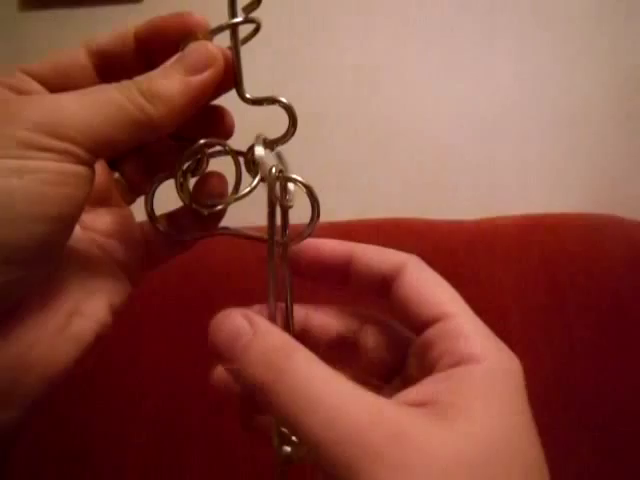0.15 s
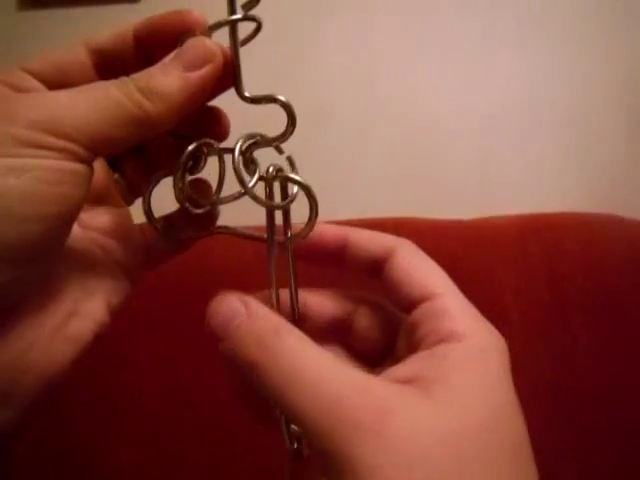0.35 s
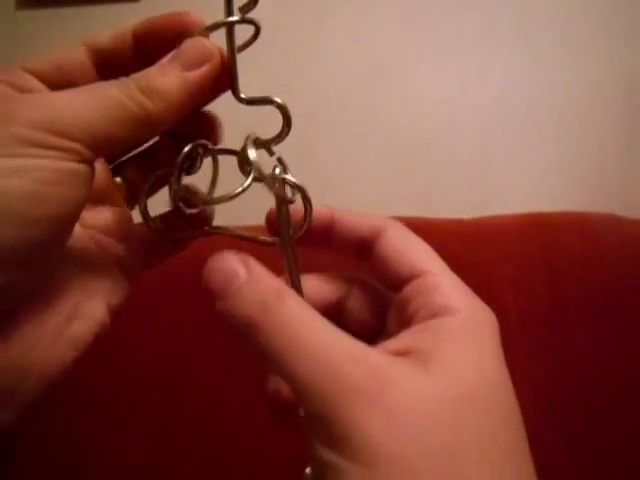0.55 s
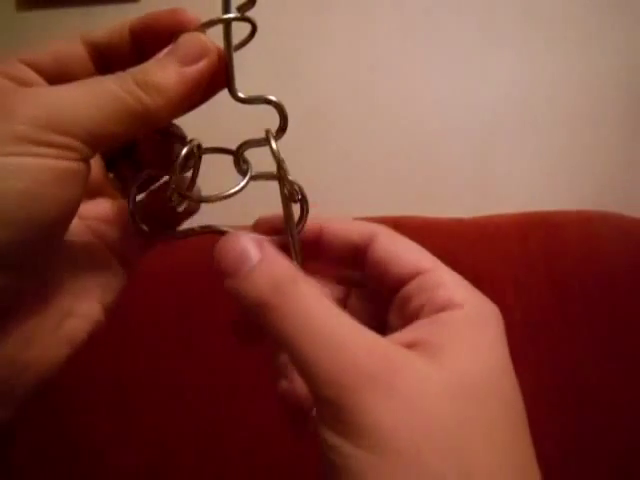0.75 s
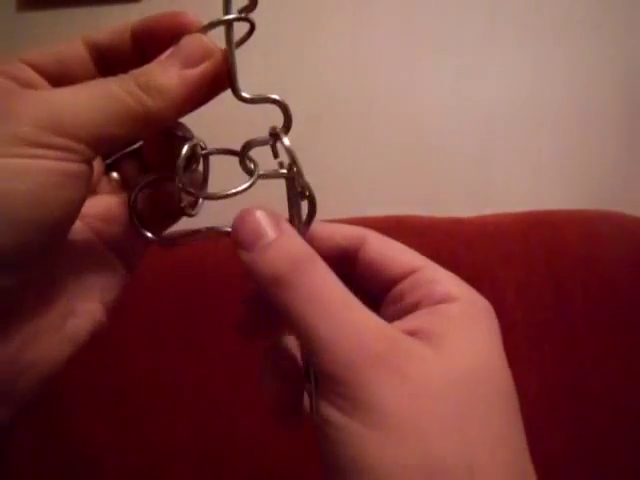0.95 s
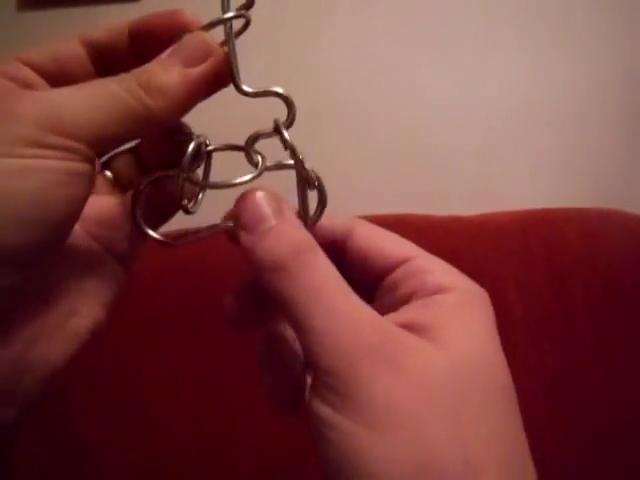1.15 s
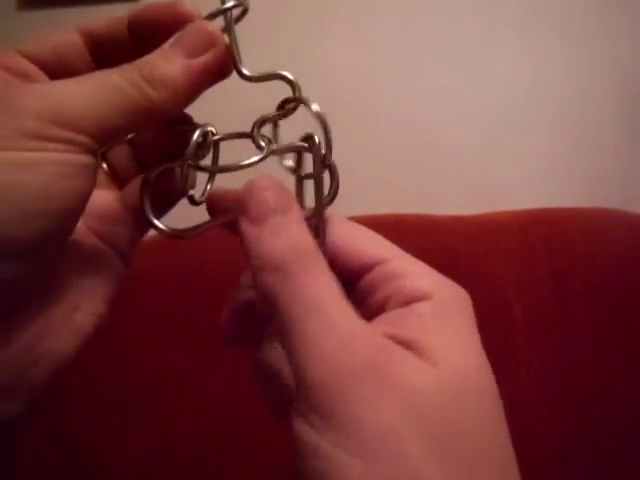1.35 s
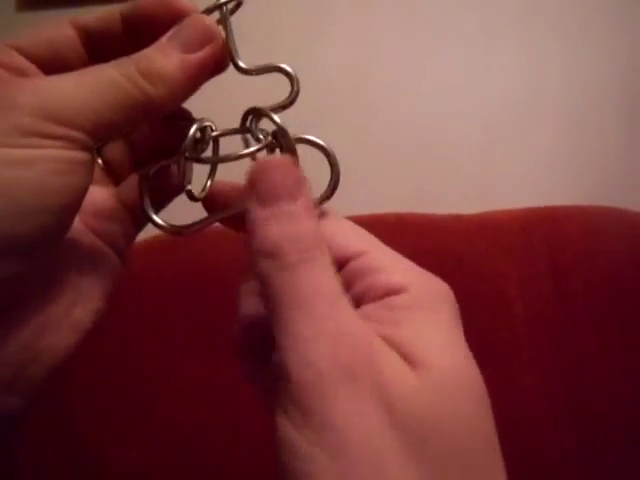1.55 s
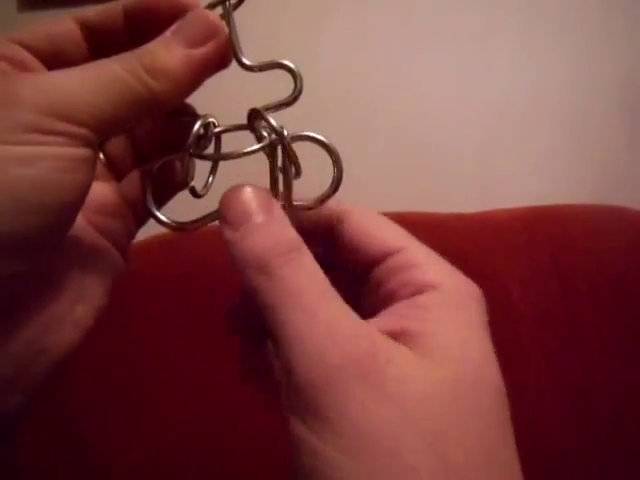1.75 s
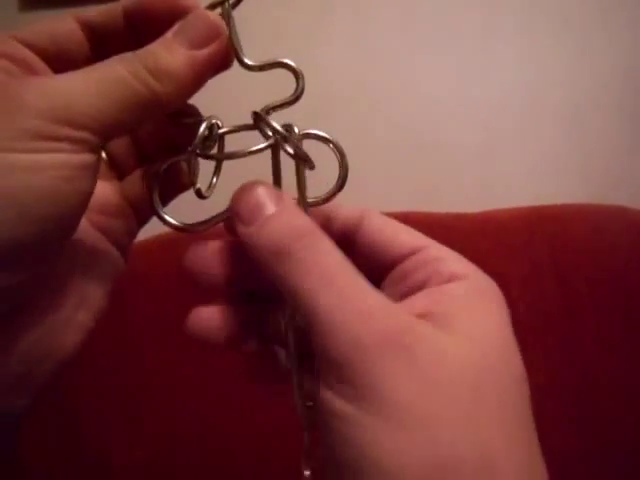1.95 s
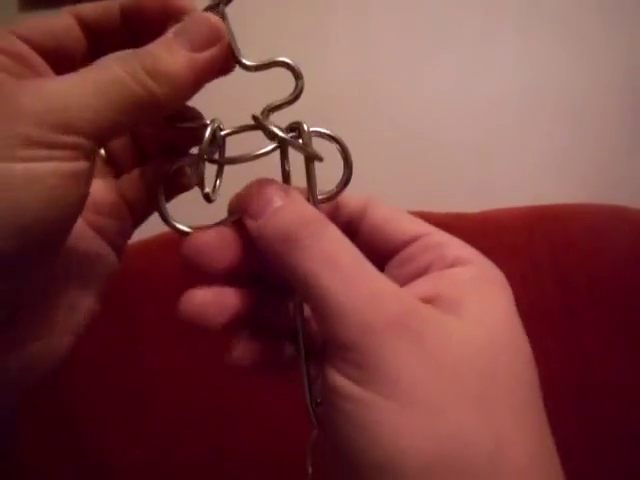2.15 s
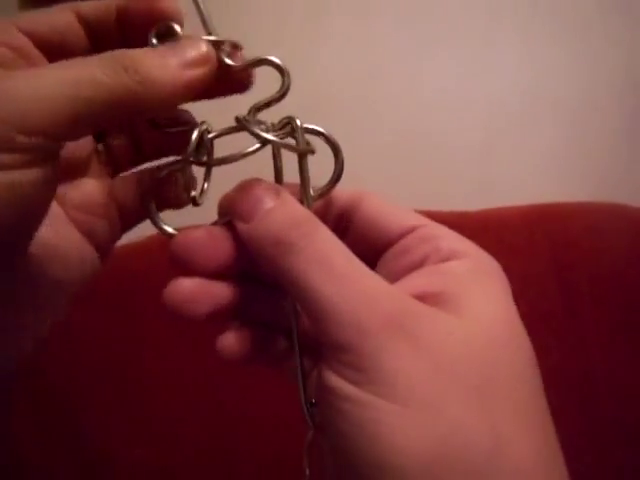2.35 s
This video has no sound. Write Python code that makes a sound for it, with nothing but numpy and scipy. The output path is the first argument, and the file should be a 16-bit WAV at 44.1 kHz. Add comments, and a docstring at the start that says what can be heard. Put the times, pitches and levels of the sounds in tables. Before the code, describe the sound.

Steel rings and wire of a handheld puzzle clink close up, slightly right, in a small quiet room. Light ticks from 0.1 s lead to a high singing ring around 0.4 s and the loudest, dense rattle at 0.6-0.8 s. After one small tick at 1.0 s, a second flurry runs 1.35-1.7 s, with sparse touches around 2.0 and 2.2 s. Soft rushing hiss swells and sinks over faint hum.

```python
"""Hands work a steel wire puzzle in a quiet room, close to two microphones and mostly a little to the right.
Over a faint hum and a rush that swells and sinks, light touches come first and a free ring starts to sing;
by 0.6 s they grow into the biggest rattle, with ring, wire loop and handle ringing. After a lull come a second
flurry from 1.35 s and a few last touches from 1.96 s. Each touch is a chatter of tiny contacts driving the
high modes of the steel; free parts ring as dying sines, and the rush is coloured noise."""
import sys
import numpy as np
from scipy import signal
from scipy.fft import rfft, irfft, next_fast_len
from scipy.io import wavfile

SR = 44100
rng = np.random.default_rng(int(sys.argv[2]) if len(sys.argv) > 2 else 0)


def waveform_to_disk(signal):
    """Save audio, clipped to [-1, 1], as 16-bit WAV at the path in sys.argv[1]."""
    frames = np.transpose(np.atleast_2d(signal))
    scaled = np.clip(frames, -1, 1) * 32767
    samples = np.round(scaled).astype(np.int16)
    wavfile.write(sys.argv[1], SR, samples)


N = 105840  # samples, 2.4 s

ROOM_DB = -8.5  # room tail against the direct sound
FREE_PAN_DB = 1.5  # place of the singing parts before the lean of the pair; positive is left
RELEASE_S = 0.0016  # shortest time constant with which a chatter dies


def amp(db):
    """Amplitude factor of a level in dB."""
    return 10 ** (np.asarray(db) / 20)


def unit(x):
    """Scale x to an rms of 1."""
    return x / np.sqrt(np.mean(x ** 2) + 1e-20)


def along(points, hz):
    """Read (Hz, value) points on a log frequency axis, flat beyond the ends."""
    f, v = np.transpose(points)
    return np.interp(np.log(hz + 1), np.log(f + 1), v)


def filtered(x, response):
    """Multiply the spectrum of x by a response of frequency."""
    n = x.shape[-1]
    m = next_fast_len(n + 8192)
    return irfft(rfft(x, m) * response(np.fft.rfftfreq(m, 1 / SR)), m)[..., :n]


def causal(gain_db, size=512):
    """Minimum-phase impulse response with the given dB colour: its energy comes as early as it can."""
    cepstrum = irfft(np.log(amp(gain_db(np.fft.rfftfreq(size, 1 / SR)))))
    cepstrum[1:size // 2] *= 2
    cepstrum[size // 2 + 1:] = 0
    return irfft(np.exp(rfft(cepstrum)))


def add(out, s, x):
    """Mix x into out at time s."""
    part = out[:, max(round(s * SR), 0):][:, :x.shape[-1]]
    part += x[..., :part.shape[1]]


def noise(spectrum):
    """Coloured stereo noise of rms 1; mid and side are weighted so that the bass is narrower."""
    # likeness of the two microphones: f/Hz, correlation
    likeness = [(30, .75), (100, 0.56), (300, .3), (800, 0.17), (3000, 0.17), (12000, 0.041)]

    def mid_and_side(hz):
        turn = np.arccos(np.clip(along(likeness, hz), -1, 1)) / 2
        return amp(along(spectrum, hz)) * [np.cos(turn), np.sin(turn)]

    mid, side = filtered(rng.standard_normal((2, N)), mid_and_side)
    return unit(np.array([mid + side, mid - side]))


def background():
    """A soft rush and its hiss, both coloured noise, swell together over a faint steady sine hum."""
    # shared swell of rush and hiss: t/s, level/dB
    swell_points = [(0.0, -60.5), (0.48, -50.5), (0.75, -50), (0.86, -56.5), (1.34, -56.5), (1.62, -50),
                    (2.02, -52.5), (2.2, -50.5), (2.33, -51), (2.4, -51)]
    # colour of the rush: f/Hz, relative level/dB per Hz
    rush_colour = [(15, -66), (25, 2), (102, -6), (264, -7.5), (318, -6.5), (472, -9.5), (991, -11.5),
                   (2080, -16.5), (2310, -15.5), (8240, -21.5), (9660, -26), (14000, -36.5)]
    # colour of the hiss: f/Hz, relative level/dB per Hz
    hiss_colour = [(2000, -21), (5000, -17), (8000, -13.5), (11000, -10), (14000, -11)]
    rush_db, hiss_db = 5, 0  # over the swell
    hum_hz, hum_db = 441.4, -69.5
    t = np.arange(N) / SR
    swell = amp(np.interp(t, *np.transpose(swell_points)))
    rush = amp(rush_db) * noise(rush_colour)
    hiss = amp(hiss_db) * noise(hiss_colour)
    hum = amp(hum_db) * unit(np.sin(2 * np.pi * hum_hz * t))
    return swell * (rush + hiss) + hum


def room(x):
    """The small room's short answer: a dying noise tail, a different one for each microphone."""
    t60_s, onset_s = 0.15, .003
    t = np.arange(SR // 4) / SR
    tail = rng.standard_normal((2, len(t))) * amp(-60 * t / t60_s) * (1 - np.exp(-t / onset_s))
    return signal.fftconvolve(x, tail / np.linalg.norm(tail[0]), axes=1)[:, :x.shape[1]]


def placed(x, pan_db):
    """Share the power of x between the two microphones by frequency, the highest tones leaning right."""
    # lean of the pair: f/Hz, left over right/dB
    lean = [(3000, -1.5), (6300, 4), (9500, -4.5), (13000, -13)]

    def shares(hz):
        left_over_right_db = pan_db + along(lean, hz)
        return np.sqrt(2 / (1 + amp(np.outer([-2, 2], left_over_right_db))))

    return filtered(x, shares)


def in_room(x, pan_db):
    """The direct sound at its place, with its room tail."""
    return placed(x, pan_db) + amp(ROOM_DB) * room(x)


def modes(t, hz, t60):
    """One dying sine for each mode."""
    return np.sin(2 * np.pi * hz[:, None] * t) * amp(-60 * t / np.reshape(t60, (-1, 1)))


def free_part(strikes, partials):
    """A part that no finger damps rings with clear tones until the next knock starts it anew."""
    detune, attack_s, stop_s = 0.0011, 0.00074, .001  # detune is a share of each pitch
    out, t = np.zeros((2, N)), np.arange(SR // 3) / SR
    next_knocks = [row[0] for row in strikes[1:]] + [N / SR]
    hz, mode_db = np.transpose(partials)
    for (s, db, t60, overtones_db), stop in zip(strikes, next_knocks):
        gains = amp(db + mode_db + overtones_db * (hz > hz[0]))
        pitches = hz * (1 + detune * rng.standard_normal(len(hz)))
        tone = gains @ modes(t, pitches, t60)
        attack = 1 - np.exp(-t / attack_s)
        cut = np.exp(-np.maximum(t - (stop - s), 0) / stop_s)
        add(out, s, in_room(np.array([tone, tone]) * attack * cut, FREE_PAN_DB))
    return out


def long_handle():
    """The long handle, nudged during the big rattle, rings in its lower modes."""
    # nudges: t/s, level/dB, t60/s, extra level of the overtones/dB
    nudges = [(.705, -40.5, 0.11, -2), (.768, -44.5, .08, 5)]
    # modes: f/Hz, level/dB
    partials = [(2190, -0.5), (3760, 4), (5420, 12.5)]
    return free_part(nudges, partials)


def wire_loop():
    """The heavy wire loop rings in its own modes when knocked."""
    # knocks: t/s, level/dB, t60/s, extra level of the overtones/dB
    knocks = [(.6395, -28.5, 0.061, 1), (.702, -41.5, 0.14, 11.5), (.767, -35, 0.066, 9)]
    # modes: f/Hz, level/dB
    partials = [(4857, 4), (6580, 2.5), (7650, -6), (9860, -3.5), (11275, 7), (12440, 7)]
    return free_part(knocks, partials)


def swinging_ring():
    """A ring swinging free sings high, each knock setting it off afresh."""
    # knocks: t/s, level/dB, t60/s, extra level of the overtones/dB
    knocks = [(.401, -26, 0.17, 6), (.428, -34.5, 0.17, -3), (.457, -27, 0.25, -8), (.48, -27, 0.13, 6.5),
              (.716, -36, .16, 27), (.733, -40, .16, 22), (.752, -31, .09, 6), (.774, -28, 0.067, 15),
              (1.589, -39, 0.43, -1), (1.614, -29.5, 0.078, -3)]
    # modes: f/Hz, level/dB
    partials = [(9014, 1), (10495, -12.5), (13055, -16), (13600, -18)]
    return free_part(knocks, partials)


def pings():
    """A gripped wire speaks briefly with one tone, set by its free length."""
    # wire held at different points: t/s, f/Hz, level/dB, t60/s
    wire_pings = [(.186, 6050, -29, 0.034), (.457, 5200, -31, 0.029), (1.642, 11220, -14, .04),
                  (1.644, 5860, -32, .04)]
    attack_s = .0005
    out, t = np.zeros((2, N)), np.arange(SR // 5) / SR
    for s, hz, db, t60 in wire_pings:
        x = amp(db) * modes(t, np.array([hz, hz]), t60) * (1 - np.exp(-t / attack_s))
        add(out, s, in_room(x, FREE_PAN_DB))
    return out


def chatter(t, length):
    """A first contact, then a dense run of smaller ones that dies once the parts settle."""
    contacts_per_s, size_scatter_db, first_db = 2200, 3, 3
    fade_share = 0.17  # longer scrapes die more slowly, by this share of their length
    sizes = amp(size_scatter_db * np.clip(rng.standard_normal(len(t)), -2, 1.5))
    hits = (rng.random(len(t)) < contacts_per_s / SR) * sizes
    hits *= rng.choice([-1, 1], len(t))
    hits[0] = amp(first_db)
    return hits * np.exp(-np.maximum(t - length, 0) / (RELEASE_S + fade_share * length))


def damped(colour, count=90):
    """The short ring of gripped wire: every grip leaves other modes."""
    t60_s = .022
    mic_alike = .6  # share of the power common to both microphones
    hz = rng.uniform(2000, 14500, count)
    common, own = rng.standard_normal((2, count))
    left = np.sqrt(mic_alike) * common + np.sqrt(1 - mic_alike) * own
    gains = np.array([left, common]) * amp(colour(hz))
    return gains @ modes(np.arange(SR // 20) / SR, hz, t60_s)


def clink(length, low_db, top_db, ring_db):
    """One touch: a sharp tick, then chatter heard bare, through damped modes and through lasting ones."""
    # lasting modes of the rings: f/Hz, level/dB, t60/s
    steel = [(5450, -16, 0.11), (6010, -14.5, 0.21), (6520, -9, 0.17), (7570, -7.5, 0.24),
             (8780, -2.5, 0.094), (9560, -11, 0.11), (9100, -11.5, .09), (10400, -15, .1),
             (10500, -9, 0.12), (11278, 8, 0.076), (10830, -13, 0.057), (13050, -11, 0.13),
             (12430, -4.5, 0.15), (13045, 9, .11), (13770, -0.5, 0.098)]
    # colour of the contacts and of the modes that the fingers damp: f/Hz, level/dB
    contact_colour = [(300, -66), (1500, -31.5), (3000, -22), (5200, -10.5), (6700, -7), (8100, -12.5),
                      (8900, 1), (11300, 6), (13000, 3), (14200, -1.5)]
    crack_db, damped_db, lasting_db = -5, -3, -6.5
    tick_db = -1  # peak of the first contact over the touch's level
    mode_scatter_db = 1.5
    t = np.arange(SR // 3) / SR

    def level(x):
        """Give every touch the same mean power over its length."""
        energy = np.sum(x ** 2, axis=-1, keepdims=True)
        return x * np.sqrt((length + RELEASE_S) * SR / (energy + 1e-20))

    def tilt(hz):
        """The touch's own balance of lower and top modes."""
        return along([(7500, low_db), (9000, 0), (11400, 0), (12500, top_db)], hz)

    def colour(hz):
        """Colour of this touch in dB."""
        return along(contact_colour, hz) + tilt(hz)

    hits = chatter(t, length)

    def through(response):
        """The chatter driving a response."""
        return level(signal.fftconvolve(hits[None], response, axes=1)[:, :len(t)])

    hz, db, t60 = np.transpose(steel)
    gains = amp(db + tilt(hz) + mode_scatter_db * rng.standard_normal((2, len(hz))))
    ring = level(gains @ through(modes(t, hz, t60)))  # each mode is levelled before its gain
    crack = causal(colour)
    out = amp(crack_db) * through(crack[None]) + amp(damped_db) * through(damped(colour))
    out += amp(lasting_db + ring_db) * ring
    add(out, 0, amp(tick_db) * crack / np.abs(crack).max())
    return out


def puzzle():
    """All touches of rings and wire, each with its place and its room tail."""
    # touches: t/s, chatter length/s, level/dB before the layers' own levels, lower modes/dB, top modes/dB,
    # left over right/dB, lasting ring/dB
    touches = [(0.084, 0.014, -48, 0, -4, -3, -8.0), (0.098, 0.017, -44.5, -11, -6, -1, 4),
               (0.128, 0.0071, -50, 4, -2, -2, 8), (0.181, 0.0011, -25.5, 1, 4, -4, -22),
               (0.185, 0.019, -34, 7, 2, 2, -10), (0.2, 0.0093, -30.5, -2.0, 0, -8, 0),
               (0.226, 0.0055, -25.5, -2.5, 4.5, -2, -14), (0.258, 0.017, -49, 7, -1, -3, 1),
               (0.29, 0.003, -25.5, 1.5, 5.5, -3.5, -8.0), (0.302, 0.013, -41.5, 7, 3, -9.0, -1),
               (0.401, 0.0025, -20, -3, 3, -4, -2), (0.428, 0.0049, -34, -1, -6, 1, 7),
               (0.457, 0.0053, -25.5, -2, -3.0, 0, -9), (0.48, 0.017, -35, -2, -1, -3.0, 8.5),
               (0.5915, 0.006, -32.5, 3.0, -9, 0, -17), (0.6395, 0.02, -23, 4.5, -2.5, 0, 2),
               (0.691, 0.0049, -21, 3, 4, -6, 6), (0.701, 0.025, -21.5, 3.5, -1, 2, 2),
               (0.728, 0.021, -29, 9.5, 1.0, -2, -7), (0.752, 0.016, -18, 2.5, 4.5, -2, -7),
               (0.765, 0.013, -15, 4, 2.5, 0.5, -12), (0.778, 0.011, -21.5, 9.5, 8, -2, -27),
               (1.001, 0.0045, -36, 2, -4, 3, -9), (1.353, 0.0026, -43, 5, -8, -5.0, 3),
               (1.365, 0.0035, -37.5, 3.5, -6, 0, 1), (1.408, 0.04, -37, 6.5, 1.5, -1, -2.5),
               (1.499, 0.019, -48, 8, -4, -4.0, -13), (1.523, 0.002, -21.5, -2, -4.5, 1, -13),
               (1.527, 0.0054, -32.5, 9, -3, -4, -1), (1.545, 0.0055, -36.5, 7.0, 0, -1, -15),
               (1.56, 0.0026, -37.5, 6, -7, -7.0, 5.5), (1.589, 0.0074, -33, 8.5, 5, -2, -3),
               (1.614, 0.012, -32, 0, -7, 0, -1), (1.635, 0.0074, -33.5, 8, 3, -4.0, -7),
               (1.643, 0.0067, -18.5, 2, -6, -1, -16), (1.65, 0.0073, -25, 8, 6.5, -1, -15),
               (1.71, 0.024, -46.5, 2, -2.0, -7, -12), (1.962, 0.019, -31, 8.5, -4, -1, -8.0),
               (2.027, 0.0064, -42, 7, -3, 2, -3), (2.044, 0.003, -37.5, 14, 14, -12, 0),
               (2.2075, 0.01, -28, 5.5, 0, -1, -2.5), (2.236, 0.0054, -34.5, 4.5, -1.0, -6.0, -3.5)]
    out = np.zeros((2, N))
    for s, length, db, low_db, top_db, pan_db, ring_db in touches:
        x = amp(db) * clink(length, low_db, top_db, ring_db)
        add(out, s, in_room(x, pan_db))
    return out


def scene():
    """The puzzle's touches and its singing parts over the background."""
    singing = long_handle() + wire_loop() + swinging_ring()
    return background() + singing + pings() + puzzle()


def record(dry):
    """The recorder's band limit: a very steep fall of the treble."""
    top_hz = 14200
    return filtered(dry, lambda hz: 1 / np.sqrt(1 + (hz / top_hz) ** 240))


dry = scene()
out = record(dry)
waveform_to_disk(out)
```